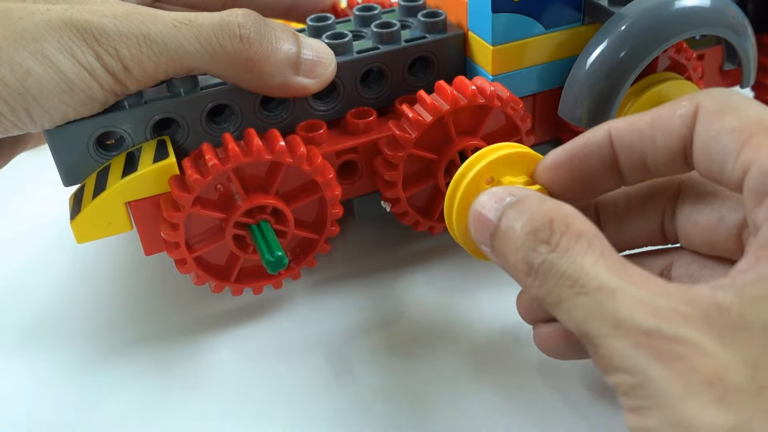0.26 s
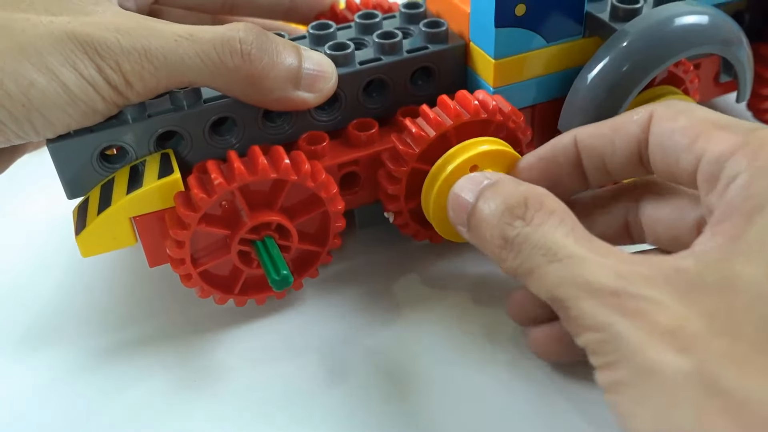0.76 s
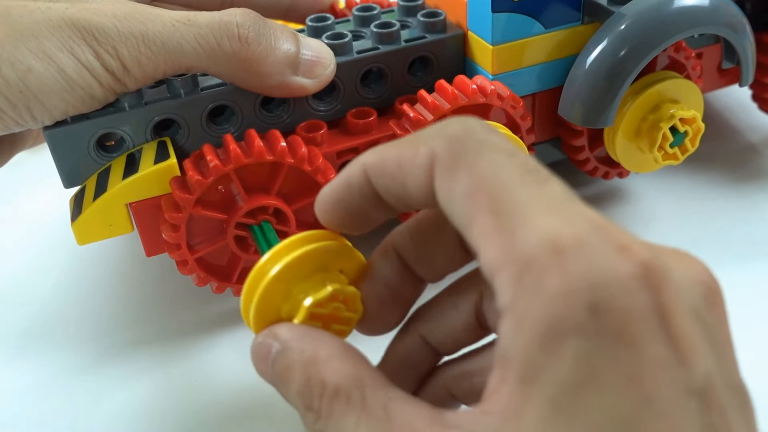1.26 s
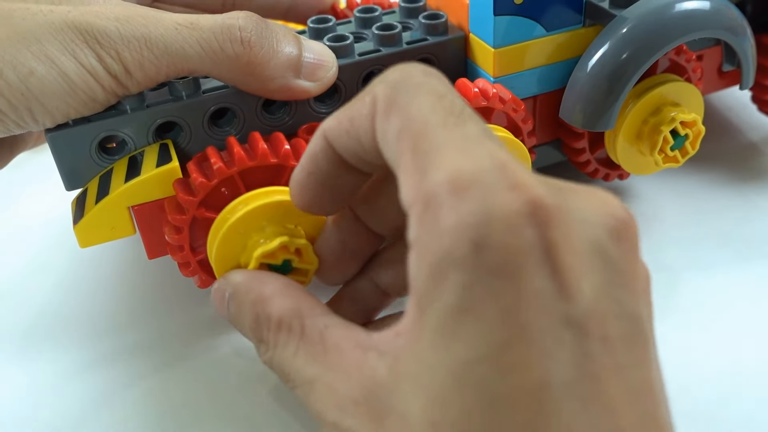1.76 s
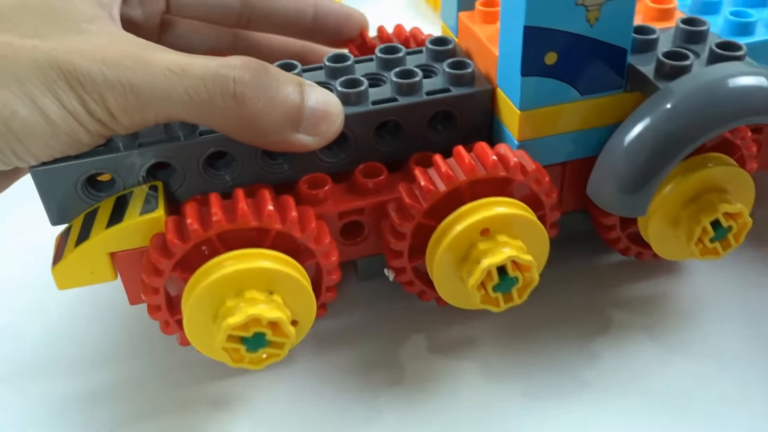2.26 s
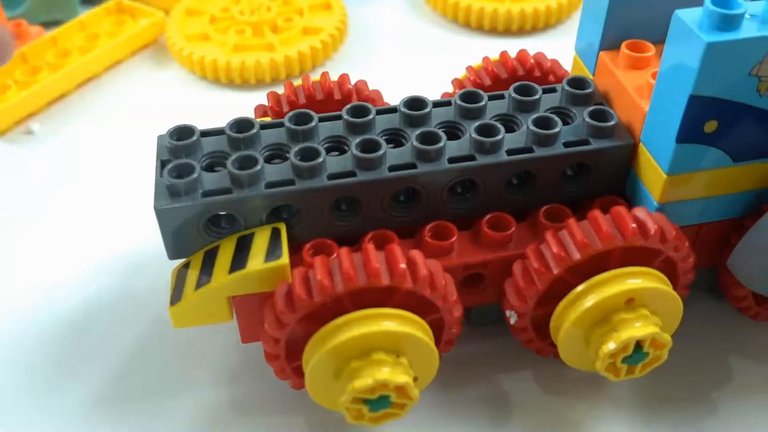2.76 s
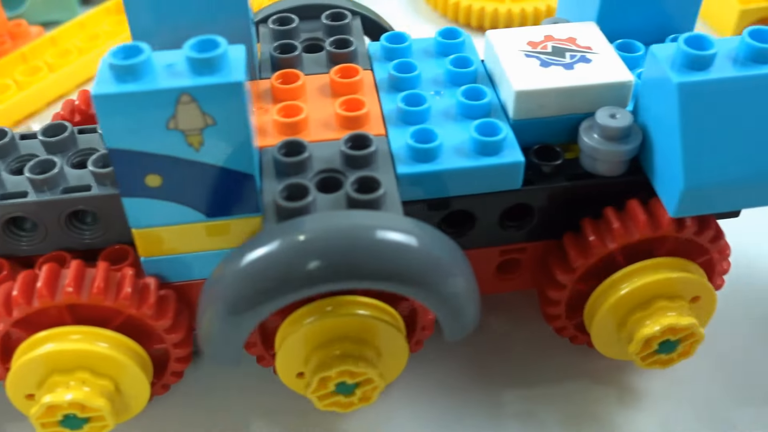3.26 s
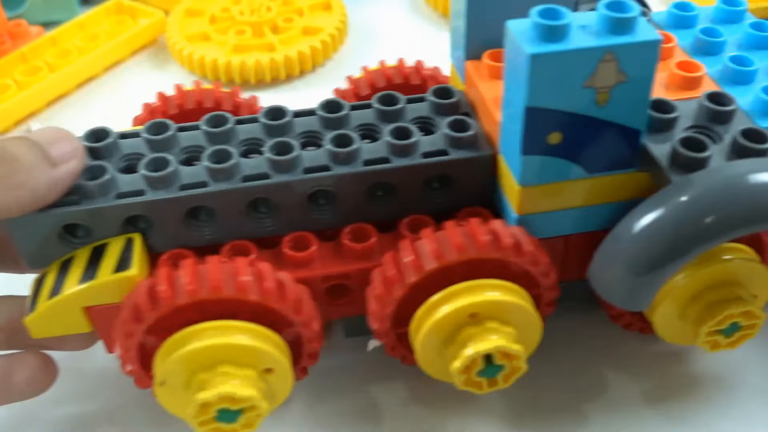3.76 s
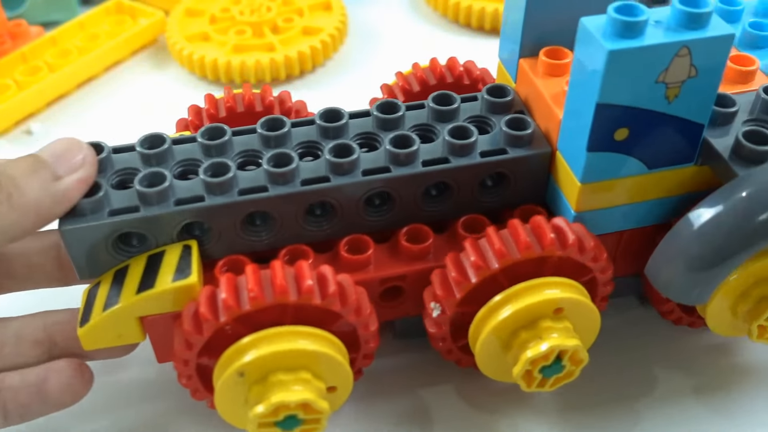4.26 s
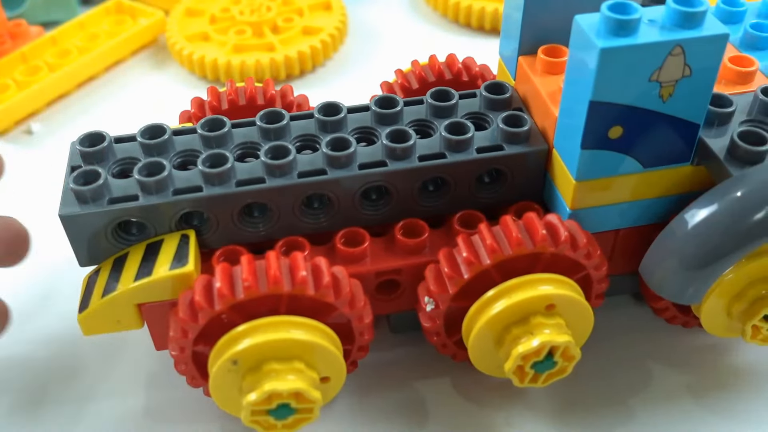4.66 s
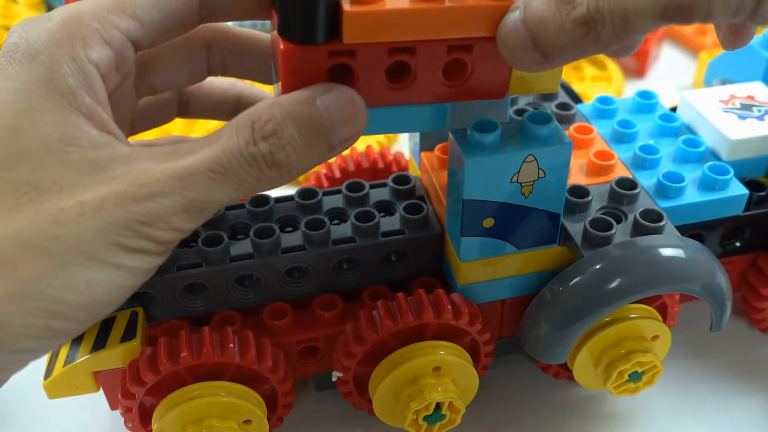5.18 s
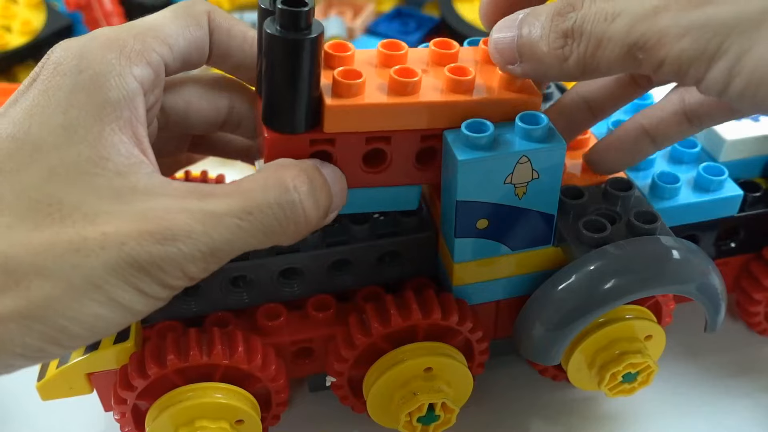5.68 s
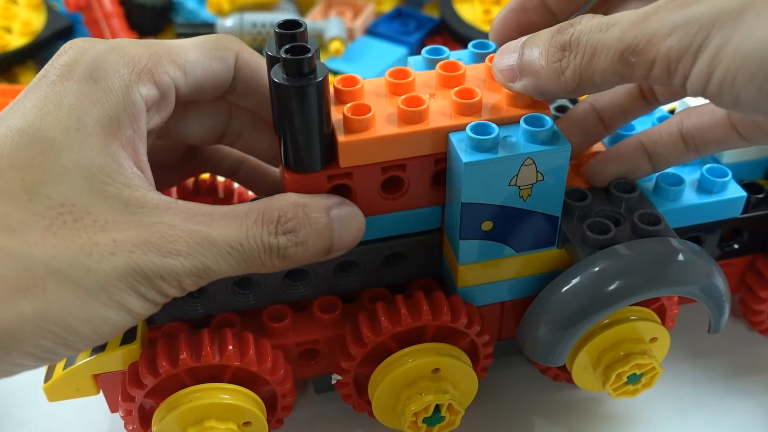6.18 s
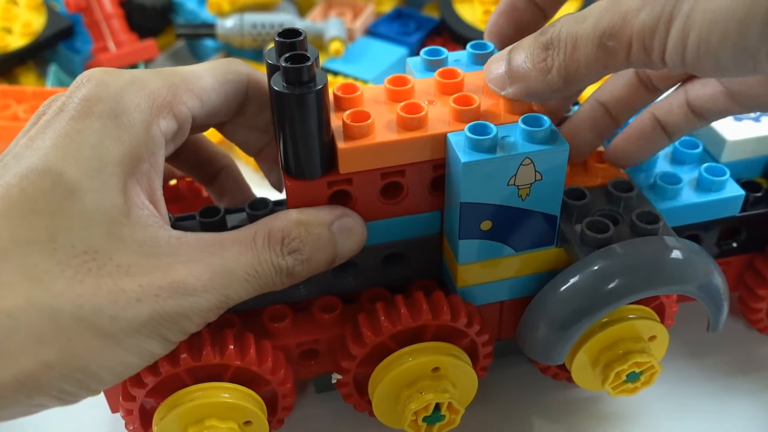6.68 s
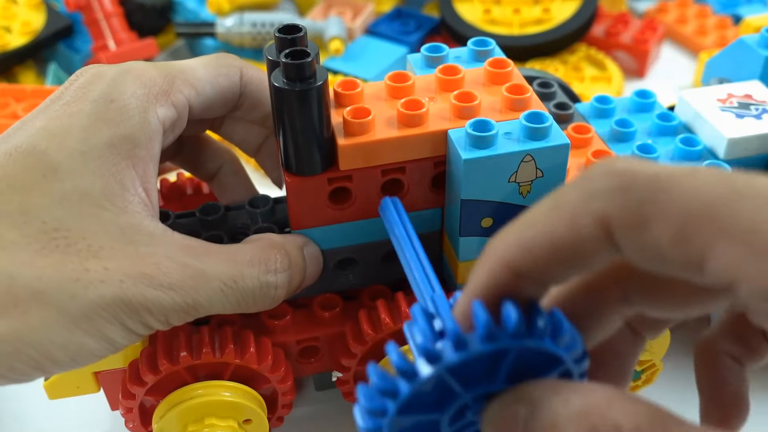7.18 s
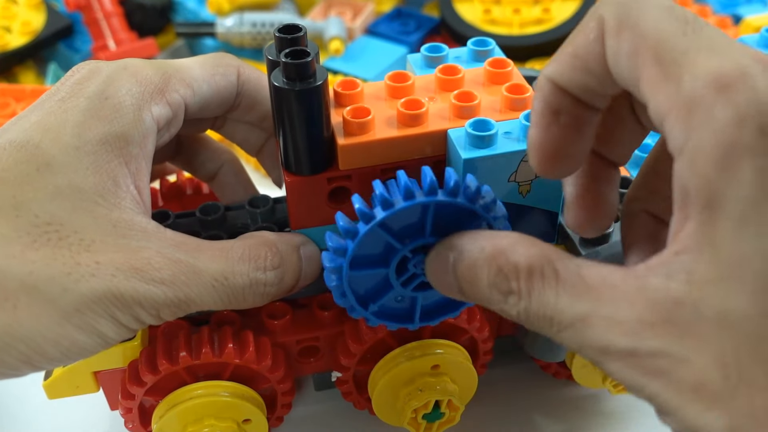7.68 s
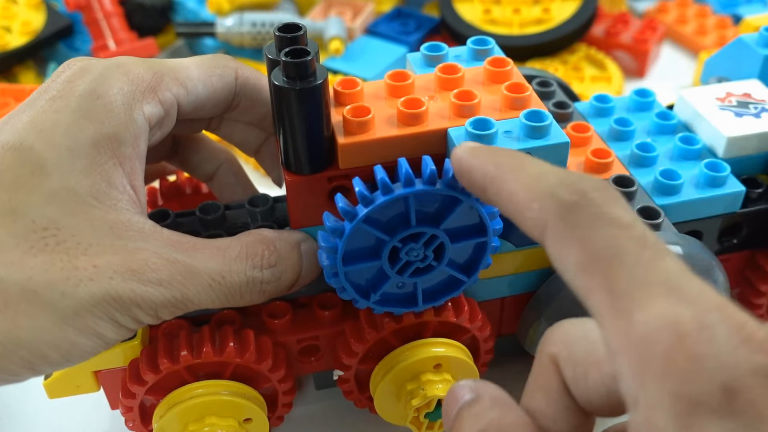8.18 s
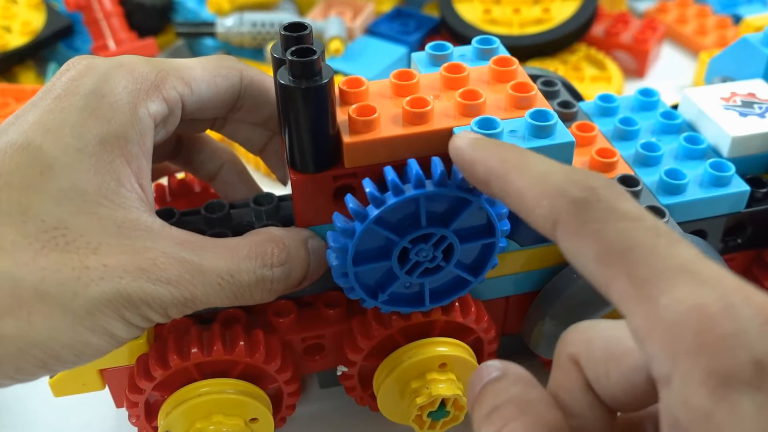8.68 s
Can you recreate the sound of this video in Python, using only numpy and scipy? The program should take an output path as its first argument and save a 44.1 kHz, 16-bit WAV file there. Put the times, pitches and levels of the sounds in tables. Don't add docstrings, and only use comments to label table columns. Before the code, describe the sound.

Hands assemble a hollow plastic toy vehicle on a table in a small room, heard close in stereo. Two wheel caps snap on about a second apart, the toy is set down with a clack, then rolled away and back in two loud bursts of toothed clatter. It rocks to rest, then a block knocks and presses on, and a geared axle slides in and snaps home. A quiet fan hushes underneath.

```python
import sys
import numpy as np
from scipy import signal
from scipy.fft import rfft, irfft
from scipy.io import wavfile
from scipy.ndimage import uniform_filter1d

SR = 44100
rng = np.random.default_rng(int(sys.argv[2]) if len(sys.argv) > 2 else 0)


def file_out(sig):
    cols = np.atleast_2d(sig).T
    lim = np.clip(cols, -1, 1)
    pcm = np.round(lim * 32767).astype(np.int16)
    wavfile.write(sys.argv[1], SR, pcm)


def magnitude_from_level(level_db):
    exponent = np.asarray(level_db, float) / 20
    return 10 ** exponent


N = 394254

LIKENESS_HZ = 2500
RING = 768
BLOCK_START_S, BLOCK_END_S = 5.3, 5.6


def unit(x):
    return x / np.sqrt(np.mean(x ** 2, axis=-1, keepdims=True))


def band(x, lo_hz, hi_hz):
    return signal.sosfilt(signal.butter(2, [lo_hz, min(hi_hz, .45 * SR)], "band", fs=SR, output="sos"), x)


def high_pass(x, hz):
    return signal.sosfilt(signal.butter(2, hz, "high", fs=SR, output="sos"), x)


def impulses(s, db):
    out = np.zeros(N)
    out[(np.asarray(s) * SR).astype(int)] = magnitude_from_level(db)
    return out


def curve(tables, column):
    t = np.arange(N) / SR
    rows = (np.transpose(table) for table in tables)
    return sum(magnitude_from_level(np.interp(t, r[0], r[column], left=-200, right=-200)) for r in rows)


def flicker(rate, db):
    k = int(SR / rate)
    steps = np.repeat(rng.standard_normal(N // k + 1), k)
    return magnitude_from_level(db * 0.97 * uniform_filter1d(steps, k)[:N])


def stereo_noise(hz, size=N):
    mid, side = rng.standard_normal((2, size))
    return mid + np.clip(hz / LIKENESS_HZ, .15, 1) * side * np.array([[1], [-1]])


# f/Hz, level/dB per Hz
HUSH_SPECTRUM = [(24, -92), (40, -66.5), (106, -32), (266, -16.5), (345, -14), (449, -19), (606, -21),
                 (653, -21), (1680, -20), (1960, -28.5), (2640, -24.5), (2840, -26.5), (9180, -30),
                 (13000, -30), (15500, -30.5)]
# f/Hz, width/Hz, level/dB
FAN_BANDS = [(840, 41, 6), (1070, 20, 8), (1690, 67, 6), (2370, 140, 11)]
# f/Hz, level/dB
FAN_LINES = [
    (358, -76),
    (119, -89.5),
]


def hush():
    hz = np.fft.rfftfreq(N, 1 / SR) + 1
    corner_hz, corner_db = np.transpose(HUSH_SPECTRUM)
    shape = magnitude_from_level(np.interp(np.log(hz), np.log(corner_hz), corner_db))
    shape = shape * magnitude_from_level(sum(db / (1 + (2 * (hz - f) / width) ** 2) for f, width, db in FAN_BANDS))
    mid, side = rfft(rng.standard_normal((2, N)))
    air = irfft(shape * (mid + np.clip(hz / LIKENESS_HZ, .3, 1) * side * np.array([[1], [-1]])), N)
    air = air / np.sqrt(np.mean(air.mean(axis=0) ** 2)) * magnitude_from_level(-63.5)
    t = np.arange(N) / SR
    return air + sum(np.sqrt(2) * magnitude_from_level(db) * flicker(24, 0.83) * np.sin(2 * np.pi * f * t) for f, db in FAN_LINES)


# t/s, level/dB
NUDGES = [(1.1, -73), (2.621, -45.5), (2.76, -70.5), (4.2, -52), (4.5, -76), (4.8, -83), (5.32, -53.5),
          (6.36, -59.5), (6.599, -60), (7.7, -54), (8.2, -74)]


def shake():
    s, db = np.transpose(THUDS[3:] + NUDGES)
    blows = impulses(s, db + 4.5)
    t60_s = .4
    after = signal.lfilter([1], [1, -magnitude_from_level(-60 / t60_s / SR)], blows)
    gain = magnitude_from_level(-84) + after + magnitude_from_level(-38) * curve([PUSH, PULL], 1)
    return unit(band(stereo_noise(750), 93, 380)) * gain * flicker(22, 3.7) * magnitude_from_level(-8.0)


def ring(hz, db, t60_ms):
    t = np.arange(RING, dtype=np.float32) / SR
    pole = (2j * np.pi * hz - 1000 * np.log(1000) / t60_ms).astype(np.complex64)
    rise = np.clip(hz[..., None] * t / .9, 0, 1).astype(np.float32) ** 2
    y = np.sum(magnitude_from_level(db)[..., None] * rise * np.exp(pole[..., None] * t).imag, axis=1)
    return y / np.abs(y).max(axis=1, keepdims=True)


def shell(modes, events, kinds=48):
    hz, db, t60_ms = np.tile(np.transpose(modes), 2)
    chance = rng.standard_normal((kinds, 2, len(hz)))
    part_hz = hz * (1 + .09 * chance[:, 0])
    part_t60_ms = np.minimum(t60_ms, 14000 / hz) + 0 * chance[:, 0]
    parts = ring(part_hz, db + 1.5 * chance[:, 1], part_t60_ms)
    return parts[np.arange(events) % kinds]


def apart(x, y):
    return x - y * (np.sum(x * y, axis=1) / np.sum(y ** 2, axis=1))[:, None]


# f/Hz, level/dB, T60/ms
HOLLOW = [(466, -29.5, 16), (606, -26.5, 4.5), (770, -1.5, 23), (1044, 6, 14.5), (1140, 12.5, 15)]
# f/Hz, level/dB, T60/ms
WALLS = [(1255, 4, 3.83), (1670, 3, 8.6), (2230, 1.5, 13.3), (2570, 5.5, 17.8), (3178, 4, 17),
         (3780, -4.5, 7.2)]
# f/Hz, level/dB, T60/ms
SNAP = [(4207, 13.5, 1.6), (4625, -0.5, 5), (5600, 2, 4.7), (7550, 0.5, 4.6), (7010, 5.5, 1.69),
        (9700, -9.5, 4.4), (9570, 1, 2.47), (12100, -15.5, 2.7), (14800, -11.5, 2.5)]


def knocks(s, peak_db, hz, hollow_db, snap_db, chatter_ms, walls_db, loose, cycles=11):
    count = len(s)
    hollow_gain, snap_gain = magnitude_from_level(hollow_db)[:, None], magnitude_from_level(snap_db)[:, None]
    walls, snap = shell(WALLS, count), shell(SNAP, count)
    body = ring(hz[:, None], np.zeros((count, 1)), 1000 * min(cycles, 17) / hz[:, None])
    body = body + magnitude_from_level(walls_db) * walls
    body = body + hollow_gain * shell(HOLLOW, count) + snap_gain * snap
    uneven = magnitude_from_level(walls_db - 7.5) * apart(shell(WALLS, count), walls)
    uneven = uneven + snap_gain * magnitude_from_level(-2.0) * apart(shell(SNAP, count), snap)
    ms = 1000 * np.arange(RING) / SR
    contacts = np.clip(rng.standard_normal((count, RING)) ** 3 * loose, -1, 1)
    contacts[:, 0] = 0.55
    contacts = contacts * np.exp(-(ms / np.clip(chatter_ms, .2, 9)[:, None]) ** 1.3)
    mid, side = signal.fftconvolve(contacts[None], np.array([body, uneven]), axes=2)
    gain = magnitude_from_level(peak_db) / np.abs(mid).max(axis=1)
    out = np.zeros((2, N + 2 * RING))
    for i, g, m, d in zip((s * SR).astype(int), gain, mid, side):
        out[:, i:i + len(m)] += g * np.array([m + d, m - d])
    return out[:, :N]


def cracks(s, db):
    edges = impulses(s, db + 3.5)
    ms = 1000 * np.arange(-64, 65) / SR
    rebound = magnitude_from_level(-12) * np.exp(-((ms - .45) / 0.18) ** 2)
    crack = np.exp(-(ms / .082) ** 2 / 2)
    return signal.fftconvolve(edges, rebound - crack, "same")


# t/s, peak level/dB, loudest mode f/Hz, bright snap level/dB
KNOCKS = [(0.491, -50, 860, -20), (0.7, -52, 570, -30), (1.043, -48, 1690, -28), (1.63, -31, 1307, -7),
          (2.046, -40, 3200, -18), (2.31, -42.5, 1380, -7), (2.514, -31.5, 1014, -9),
          (2.634, -23, 860, -10), (5.313, -29, 1440, -23), (5.365, -29, 1670, -20),
          (5.415, -23.5, 1573, -21.5), (5.513, -29.5, 1400, -21), (5.53, -36.5, 1400, -19),
          (5.583, -29, 1540, -21.5), (6.498, -39, 2420, -14), (6.566, -33.5, 1480, -11.5),
          (6.737, -47.5, 585, -23), (6.844, -38.5, 1610, -36), (7.11, -40.5, 3270, -11.5),
          (7.392, -24.5, 1540, -21), (8.286, -35.5, 1317, -16), (8.499, -24.5, 2500, -17),
          (8.636, -27, 1670, -19), (8.683, -22.5, 1770, -21)]
TAPS = [(0.192, -28, 910, -17), (0.592, -49.5, 566, -20), (0.89, -38.5, 840, -5), (1.085, -45, 1210, -26),
        (1.157, -38.5, 2050, -26), (1.518, -28, 1470, -12), (2.542, -12, 875, -12.5),
        (2.63, -18, 1110, -18), (2.718, -41, 960, -3), (2.838, -40.5, 2220, -12), (4.57, -43.5, 560, -31),
        (4.641, -43.5, 2540, -13), (4.661, -38.5, 1020, -4.5), (4.692, -38.5, 2370, -14),
        (5.713, -45, 684, -25), (5.775, -38, 1780, -31), (5.919, -27.5, 2260, -21), (5.971, -42, 2230, -29),
        (6.04, -41.5, 2110, -15), (6.097, -22.5, 2180, -13.5), (6.124, -20, 1910, -10),
        (6.362, -36.5, 3000, -11.5), (7.671, -42, 2560, 2), (7.807, -17.5, 850, -8.5),
        (7.863, -22.5, 815, -8), (8.044, -34, 2100, -14), (8.304, -39, 1970, -26),
        (8.619, -43.5, 2810, -12), (8.83, -23.5, 2100, -16), (8.932, -39, 2570, -3)]
SNAPS = [(2.551, -16.5, 1434, -26), (2.622, -12.5, 1290, -16), (5.87, -39.5, 1600, -16),
         (6.1266, -17.5, 3050, -3.5), (6.227, -26, 4900, -4.5), (7.698, -24.5, 1670, -0.5),
         (7.714, -28, 3230, 4), (7.761, -23, 2880, 22), (7.774, -23.5, 4760, 3), (7.783, -29, 3190, 13),
         (7.848, -16.5, 690, -11), (7.852, -15, 817, -7), (7.896, -11.5, 2080, -0.5),
         (8.018, -24.5, 2360, -17), (8.421, -46, 1500, -25), (8.442, -24.5, 1990, -15),
         (8.447, -26, 1670, -45), (8.866, -19, 2500, -21)]
CAPS = [
    (1.918, -20.5, 3390, -16),
    (1.918, -20, 5600, -33),
]
RIMS = [(0.7895, -19.5, 7600, -45), (8.4415, -33, 4300, -36), (8.4975, -29.5, 4150, -33),
        (8.6845, -27, 3200, -40), (8.8305, -43, 5200, -30), (8.862, -27.5, 2200, -11),
        (8.8655, -20, 4400, -20), (8.866, -36, 7300, -25), (7.808, -20, 5100, -30),
        (6.846, -37.5, 520, -40), (2.3, -40.5, 500, -38), (2.544, -21, 520, -43.5), (7.897, -22, 7500, -30),
        (6.6, -41, 3100, -30), (5.6, -36, 2000, -32), (7.897, -13.5, 2960, -31), (6.1255, -17, 2940, -30)]
# hollow level/dB, chatter/ms, walls level/dB
KINDS = [
    (8.5, 9.5, 1.5),
    (4.5, 8, -3),
    (-37, 5.25, 5.5),
    (-42, 3.9, -9.5),
]
# t/s, peak level/dB
HUB_CRACKS = [
    (7.8547, -9.5),
]


def clicks():
    late_s, softer_db = 0.0059, -9
    bounces = np.array(KNOCKS) + np.outer(1 + rng.random(len(KNOCKS)), [late_s, softer_db, 0, 0])
    s, db, hz, snap_db = np.concatenate([KNOCKS, bounces, TAPS, SNAPS, CAPS, RIMS]).T
    counts = [2 * len(KNOCKS), len(TAPS), len(SNAPS), len(CAPS + RIMS)]
    hollow_db, chatter_ms, walls_db = np.repeat(KINDS, counts, axis=0).T
    walls_db = walls_db - 7 * (s > BLOCK_START_S) * (s < BLOCK_END_S)
    hits = knocks(s, db, hz, hollow_db - 13.0, snap_db + 14.0, chatter_ms, walls_db[:, None],
                  loose=0.15, cycles=13.0)
    return high_pass(hits, 480) + cracks(*np.transpose(HUB_CRACKS))


# f/Hz, T60/s, level/dB
ROOM = [(127, 0.88, -8.5), (264, 0.44, -6.5), (450, 0.33, -12.5),
        (1000, .58, -18), (2000, .44, -19), (4000, .3, -21), (8000, .18, -26), (13000, .11, -32)]


def echoes():
    t = np.arange(int(.9 * SR)) / SR
    tail = 0
    for hz, t60, db in ROOM:
        noise = band(stereo_noise(hz, size=len(t)), hz / 1.61, hz * 1.915)
        tail = tail + magnitude_from_level(db) * noise * magnitude_from_level(-60 * t / t60)
    return tail * np.clip((t - .002) / .009, 0, 1)


def room(x):
    forward = magnitude_from_level(-24.5) * (x[0] + x[1]) / 2
    sideways = magnitude_from_level(-14.5) * (x[0] - x[1]) / 2
    return sum(signal.fftconvolve(y[None], echoes(), axes=1)[:, :N] for y in (forward, sideways))


# f/Hz, level/dB, T60/ms
BOX = [
    (640, -6.5, 75),
    (725, -9, 60),
]
# f/Hz, level/dB, T60/ms
BLOCK = [(1400, -13.5, 150), (1650, -18, 100), (2340, -10, 49)]


def boxes():
    t = np.arange(SR // 8) / SR
    s, db = np.transpose(KNOCKS)[:2]
    blocky = (s > BLOCK_START_S) & (s < BLOCK_END_S)
    blows = np.array([impulses(s, db), impulses(s[blocky], db[blocky])])
    bonk = [sum(magnitude_from_level(level - 60000 * t / t60_ms) * np.sin(2 * np.pi * hz * t) for hz, level, t60_ms in modes)
            for modes in (BOX, BLOCK)]
    swell = 1 - np.exp(-t / np.array([[0.015], [.004]]))
    return signal.fftconvolve(blows, bonk * swell, axes=1).sum(axis=0)[:N]


# t/s, peak level/dB, length/ms
TICKS = [(0.6994, -49, 3.8), (0.7904, -34, 3), (0.89, -36.5, 2.5), (1.9188, -27, 3), (1.632, -44, 13),
         (3.555, -39, 5.3), (1.158, -45, 5.5), (2.045, -39, 4.7), (4.661, -46, 5.5), (4.689, -49, 5.4),
         (6.8454, -29, 3.8), (6.8686, -57, 3.9), (7.111, -45, 3.9), (7.387, -37.5, 7.3), (7.898, -44, 13),
         (8.636, -43, 3.4)]


def ticks():
    out, size = np.zeros((2, N)), RING * 2
    for s, db, ms in TICKS:
        burst = band(rng.standard_normal((2, size)), 5700, 12000) * np.exp(-1000 * np.arange(size) / SR / ms)
        out[:, int(s * SR):int(s * SR) + size] += magnitude_from_level(db + 2.5) * burst
    return out


# t/s, length/s, f/Hz, level/dB
SQUEAKS = [(0.725, 0.067, 4550, -66), (1.83, 0.085, 4680, -63), (5.845, 0.08, 1420, -55),
           (5.878, 0.04, 3900, -65), (7.667, 0.028, 2580, -52), (1.069, 0.079, 1310, -62),
           (2.982, 0.015, 2504, -24), (8.301, .08, 1365, -55.5), (2.923, .011, 2200, -37),
           (4.055, .015, 2600, -27)]


def squeaks():
    t = np.arange(N) / SR
    out = np.zeros(N)
    for s, length, hz, db in SQUEAKS:
        on = (t > s) & (t < s + length)
        rasp = band(rng.standard_normal(N // 20), .97 * hz, 1.03 * hz)[:on.sum()]
        out[on] += magnitude_from_level(db) * unit(rasp) * np.sin(np.pi * ((t[on] - s) / length) ** 0.67)
    return out


# loudest t/s, swell/s, fade/s, rub level/dB, brightness/dB
SLIDES = [(0.784, 0.02, 0.072, -37.5, 7), (.95, 0.026, 0.047, -52.5, 4.5), (1.122, 0.071, 0.08, -44.5, 5),
          (1.912, 0.03, 0.037, -40.5, 7), (2.36, 0.24, 1, -49, -2), (4.62, 0.47, 0.17, -55, 5),
          (5.9, 0.7, 0.98, -52, 3.5), (6.65, 0.22, 0.71, -63.5, -24), (6.958, 0.23, 0.024, -53.5, -2),
          (7.382, 0.02, 0.015, -46, 7), (7.5, 0.03, 0.19, -58, 2.5), (7.73, 0.12, 0.56, -47, 6),
          (8.1, .05, 0.28, -73, 4), (8.68, 0.22, 0.22, -58, 1), (8.88, 0.13, .15, -63, 10)]


def rubbing():
    dull = unit(band(stereo_noise(1300) * flicker(90, 3.5), 650, 2700))
    bright = unit(band(stereo_noise(4000) * flicker(160, 2.6), 3200, 13000))
    t = np.arange(0, N / SR + .001, .001)
    edge_db = -20
    gains = 0
    for s, swell, fade, db, bright_db in SLIDES:
        away = (t - s) / np.where(t < s, max(swell, .003), max(fade, .003))
        envelope = magnitude_from_level(db + edge_db * np.minimum(away ** 2, 9))
        gains = gains + envelope * magnitude_from_level([[-9.0], [bright_db - 14.0]])
    return sum(x * np.interp(np.arange(N) / SR, t, gain) for x, gain in zip((dull, bright), gains))


# t/s, peak level/dB
SEATS = [
    (0.7895, -11.5),
    (0.793, -22),
    (1.9187, -14.5),
    (1.9241, -26),
]
# f/Hz, level/dB, T60/ms
CAP_MODES = [(915, -18, 9), (1400, -9, 10), (2490, -10.5, 27), (3050, -6, 16), (4710, -9, 16),
             (5030, 0, 15), (5320, -2, 9.3), (7500, 3, 5)]


def caps():
    hz, db, t60_ms = np.transpose(CAP_MODES)
    lean_db = 4.5 * np.outer([1, -1], (-1) ** np.arange(len(hz)))
    blows = impulses(*np.transpose(SEATS))[None]
    modes = ring(hz + 0 * lean_db, db + lean_db, t60_ms + 0 * lean_db)
    return signal.fftconvolve(blows, modes, axes=1)[:, :N]


# t/s, peak level/dB
THUDS = [(0.802, -55.5), (1.63, -63.5), (1.918, -55), (2.545, -46), (3.115, -40.5), (3.252, -42.5),
         (3.354, -42.5), (3.714, -44.5), (3.933, -43.5), (4.299, -52), (5.416, -55.5), (5.921, -66.5),
         (6.127, -50.5), (6.363, -57), (6.844, -66.5), (7.111, -68.5), (7.387, -66), (7.849, -52),
         (8.44, -64), (8.862, -60)]
# f/Hz, level/dB, T60/s
TABLE_MODES = [(208.8, 3.5, 0.71), (237.6, 2, 0.71), (285.8, 5, 0.36), (127, -22.5, .3)]


def table():
    blows = impulses(*np.transpose(THUDS))
    t = np.arange(SR) / SR
    boom = sum(magnitude_from_level(db) * np.sin(2 * np.pi * hz * t) * magnitude_from_level(-60 * t / t60) for hz, db, t60 in TABLE_MODES)
    return signal.fftconvolve(blows, boom * (1 - np.exp(-t / 0.002)))[:N]


# t/s, weight on the teeth level/dB
PUSH = [(2.92, -26), (2.988, -10.5), (3.048, -7.5), (3.119, -8), (3.272, -5.5), (3.357, -9.5), (3.4, -27.5),
        (3.46, -15)]
# t/s, weight on the teeth level/dB
PULL = [(3.562, -22), (3.636, -13), (3.667, -11), (3.712, -6), (3.845, -5.5), (3.95, -6), (4.06, -10.5),
        (4.095, -42.5)]
TEETH_ROLLED = [
    [0, 2, 4, 7, 15, 18, 19, 21],
    [0, 2, 3, 5, 10, 15, 19, 20],
]


def landings():
    rows = []
    for move, rolled in zip((PUSH, PULL), TEETH_ROLLED):
        s, db = (np.interp(np.arange(rolled[-1] + 1), rolled, col) for col in np.transpose(move))
        rows.append(np.transpose([s, db, np.gradient(s)]))
    return rows


# t/s, length/s, first level/dB, last level/dB, bright snap level/dB
JOLTS = [
    (2.548, .12, -26.5, -40, 4),
    (4.1, .36, -42, -55, 0.5),
    (7.8, .08, -54, -35.5, 8),
]


def motion():
    tables = []
    for s, db, period in map(np.transpose, landings()):
        tooth_hz = 1 / period
        rattle_db = -10.5 + 1.543 * db - 0.16 * (tooth_hz - 50.7)
        tables.append(np.transpose([s, rattle_db, -17.5 + 0.6 * tooth_hz]))
    for s, length, first_db, last_db, snap_db in JOLTS:
        tables.append(np.array([(s, first_db, snap_db), (s + length, last_db, snap_db)]))
    return sorted(tables, key=lambda rows: rows[0, 0])


def rattle(count=400):
    rows = np.concatenate(motion())
    moving = np.flatnonzero(curve(motion(), 1) > 1e-6)
    moment, strength, pitch = rng.random((count, 3)).T
    s = moving[(moment * len(moving)).astype(int)] / SR
    turned = np.interp(s, rows[:, 0], np.arange(len(rows))) % 1
    rolling = (s > PUSH[0][0]) * (s < PULL[-1][0])
    db = np.interp(s, rows[:, 0], rows[:, 1]) + 6.94 + 5.8 * strength ** 3
    db = db - 15 * turned * rolling
    snap_db = np.interp(s, rows[:, 0], rows[:, 2])
    hits = knocks(s, db, 700 * 3.8 ** pitch, 0 * s + 6.9, snap_db, 0 * s + 8.4,
                  walls_db=11.0, loose=0.035, cycles=4.7)
    return high_pass(hits, 430)


# t/s, peak level/dB
PUSH_STRIKES = [(2.9072, -31.1), (2.9133, -38.5), (2.9205, -22.7), (2.9285, -29.2), (2.9411, -26.6),
                (2.9489, -19.8), (2.9571, -20.3), (2.9662, -21.8), (2.9725, -17.0), (2.9776, -20.5),
                (2.9849, -15.0), (2.9897, -12.2), (3.007, -12.4), (3.0219, -8.7), (3.036, -8.5),
                (3.0484, -7.8), (3.073, -9.2), (3.0778, -7.5), (3.0978, -10.3), (3.1185, -7.8),
                (3.124, -7.5), (3.133, -9.3), (3.1395, -13.3), (3.1461, -10.1), (3.1509, -10.8),
                (3.1555, -7.5), (3.1672, -11.5), (3.176, -6.2), (3.1887, -11.2), (3.1956, -5.3),
                (3.2023, -11.5), (3.209, -11.9), (3.2156, -11.5), (3.2321, -8.8), (3.2388, -9.7),
                (3.2523, -6.3), (3.2597, -7.2), (3.2722, -6.8), (3.2816, -9.1), (3.2991, -11.6),
                (3.3038, -10.8), (3.3114, -11.9), (3.328, -11.0), (3.3344, -12.8), (3.348, -13.8),
                (3.3577, -9.9), (3.3623, -16.3), (3.3703, -17.5), (3.3901, -21.9), (3.4006, -18.7),
                (3.4061, -19.6), (3.4175, -23.1), (3.4245, -25.3), (3.4304, -21.4), (3.4374, -27.5),
                (3.4624, -22.3)]
# t/s, peak level/dB
PULL_STRIKES = [(3.5577, -36.2), (3.563, -23.8), (3.569, -32.9), (3.5865, -31.4), (3.5953, -21.4),
                (3.6013, -27.3), (3.616, -26.2), (3.6336, -13.5), (3.6389, -11.4), (3.6447, -19.8),
                (3.668, -7.2), (3.6734, -17.8), (3.6839, -17.0), (3.691, -7.1), (3.7115, -7.1),
                (3.7164, -11.3), (3.7218, -12.5), (3.7309, -13.0), (3.7374, -10.4), (3.742, -9.8),
                (3.7493, -7.5), (3.7631, -11.7), (3.7692, -7.7), (3.7749, -10.0), (3.7799, -12.1),
                (3.7885, -6.5), (3.8003, -11.3), (3.8078, -9.9), (3.8212, -9.6), (3.8272, -6.9),
                (3.8422, -7.2), (3.8495, -7.1), (3.8558, -9.2), (3.8629, -9.7), (3.8684, -8.9),
                (3.8748, -9.6), (3.8869, -6.8), (3.8917, -11.4), (3.9085, -10.7), (3.9165, -12.8),
                (3.9304, -8.8), (3.9353, -8.8), (3.948, -8.6), (3.9598, -11.4), (3.9771, -5.5),
                (3.9859, -10.8), (3.9908, -12.8), (4.0033, -8.0), (4.014, -10.9), (4.0331, -7.0),
                (4.0408, -8.7), (4.0461, -14.5), (4.0618, -15.9), (4.0767, -20.1), (4.0965, -17.4),
                (4.1012, -22.7)]
# t/s, peak level/dB
ROCKING = [(4.141, -34), (4.1685, -26), (4.2612, -14.5), (4.1822, -21.5), (4.204, -26), (4.2133, -21),
           (4.2253, -16), (4.2425, -16.5), (4.2528, -21), (4.2656, -16.5), (4.301, -11.5), (4.3075, -17.5),
           (4.315, -13), (4.3224, -16.5), (4.342, -15.5), (4.35, -15), (4.359, -17), (4.3681, -19),
           (4.3935, -35), (4.403, -23)]


def teeth():
    s, db = np.concatenate([PUSH_STRIKES, PULL_STRIKES, ROCKING]).T
    rows = np.concatenate(motion())
    hz = 750 * 1.7 ** rng.random(len(s))
    snap_db = np.interp(s, rows[:, 0], rows[:, 2]) - 1.5
    ring_db = np.where(s > PULL[-1][0] + .02, -6.5, -8.5)
    ringing = knocks(s - .0003, db + ring_db, hz, 0 * s + 3.5, snap_db, 0 * s + 5.5, walls_db=5.0, loose=0.1)
    return cracks(s, db) + ringing


# t/s, peak level/dB, loudest mode f/Hz, bright snap level/dB
TOUCHES = [(7.3872, -22, 880, 2.5), (7.4025, -29, 2500, -4), (7.408, -25, 1650, -30),
           (7.421, -33, 1600, -30), (7.897, -26, 15100, -32), (8.6, -40, 1760, -9),
           (7.8475, -19, 3350, -10), (7.866, -19.5, 980, -20), (8.018, -28, 3800, -15),
           (6.128, -15.5, 3060, -30), (6.131, -18.5, 1850, -30), (2.9075, -29.5, 800, -23.5)]


def touches():
    s, db, hz, snap_db = np.transpose(TOUCHES)
    return knocks(s, db, hz, 0 * s - 20, snap_db, 0 * s + 3.2, walls_db=-7.0, loose=.1, cycles=12.0)


# f/Hz, width/Hz, level/dB
TOP_PEAKS = [
    (11990, 800, 4),
    (14700, 780, 15.5),
]


def running_gear():
    wheels = teeth() + rattle() + touches()
    wheels = wheels + sum(magnitude_from_level(db) * band(wheels, hz - width / 2, hz + width / 2) for hz, width, db in TOP_PEAKS)
    return wheels - .45 * band(wheels, 330, 480)


def scene():
    toy = clicks() + running_gear() + squeaks() + boxes() + caps()
    toy = band(toy, 410, 11000) + rubbing() + ticks()
    near = toy + table() + room(toy)
    left_db = -0.2
    return near * magnitude_from_level(np.array([[left_db], [-left_db]]) / 2) + hush() + shake()


def treble_gate(x):
    turn = np.array([[1, 1], [1, -1.05]])
    hz, _, z = signal.stft(turn @ x / 2, SR, nperseg=2048, noverlap=1536)
    power = np.abs(z) ** 2
    luck = rng.standard_normal((2, len(hz) // 6 + 1, z.shape[2] // 4 + 1))
    luck = np.kron(luck, np.ones((1, 6, 4)))
    limit_db = -47 - 7 * np.clip(10000 - hz, 0, None)[:, None] / 1000
    limit_db = limit_db + 4.5 * luck[:, :len(hz), :z.shape[2]]
    keep = power > magnitude_from_level(2 * limit_db) * power[0].sum(axis=0)
    return turn @ signal.istft(z * keep, SR, nperseg=2048, noverlap=1536)[1][:, :N]


def roll_off(x):
    return signal.sosfilt(signal.butter(12, 15800, fs=SR, output="sos"), x)


def record(dry):
    x = high_pass(dry, 70)
    x = .8 * np.tanh(x / .8)
    x = signal.sosfilt(signal.ellip(8, .2, 70, 15700, fs=SR, output="sos"), x)
    mix = treble_gate(x)
    return roll_off(mix)


dry = scene()
out = record(dry)
file_out(out)
```